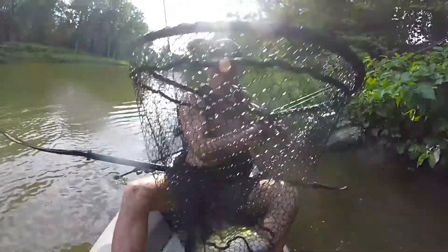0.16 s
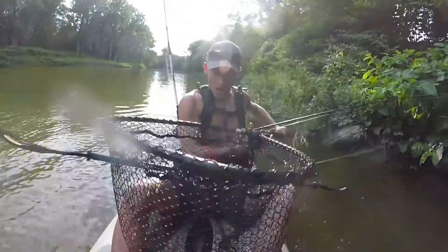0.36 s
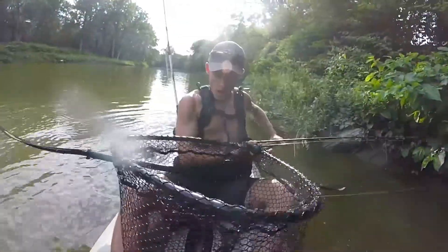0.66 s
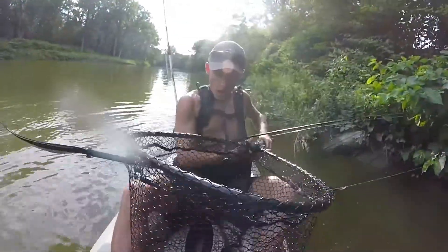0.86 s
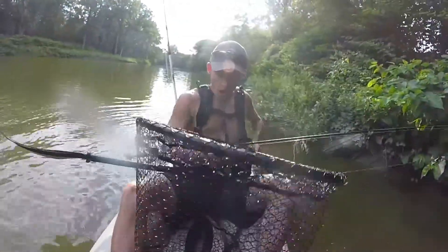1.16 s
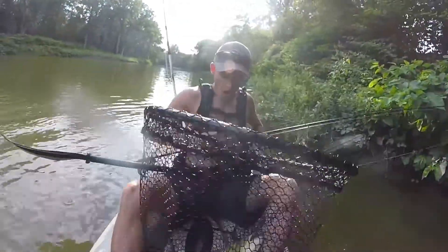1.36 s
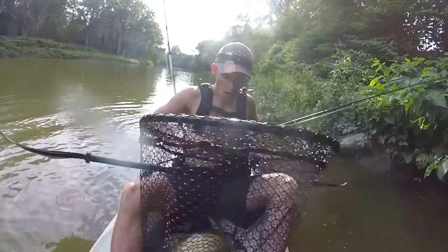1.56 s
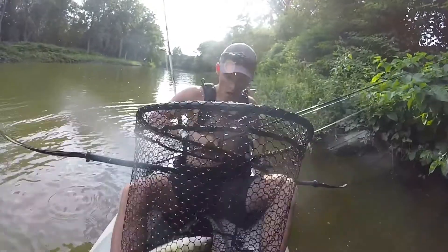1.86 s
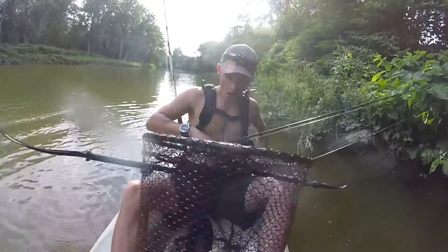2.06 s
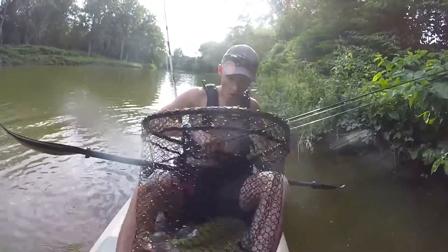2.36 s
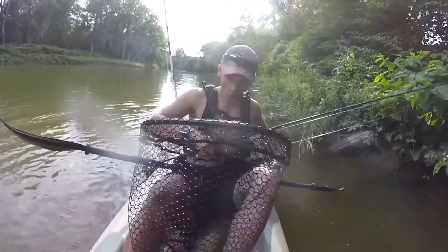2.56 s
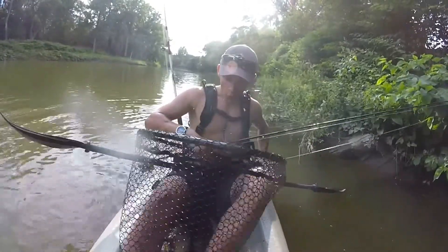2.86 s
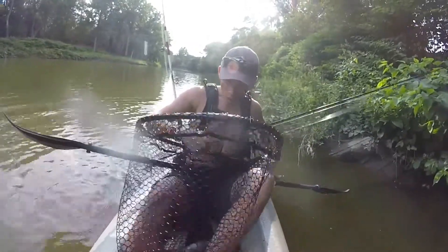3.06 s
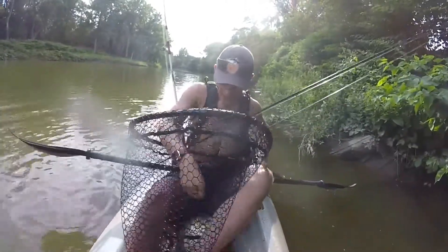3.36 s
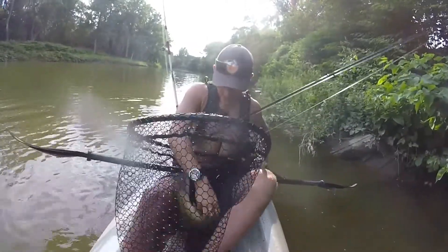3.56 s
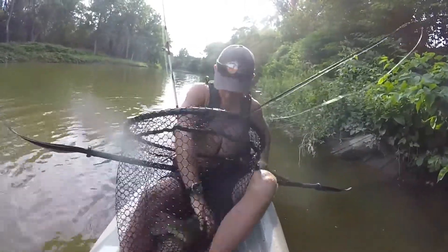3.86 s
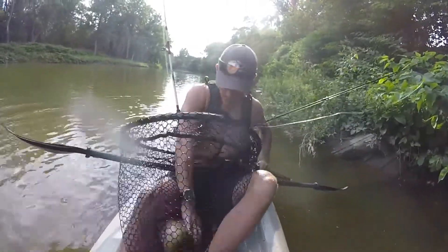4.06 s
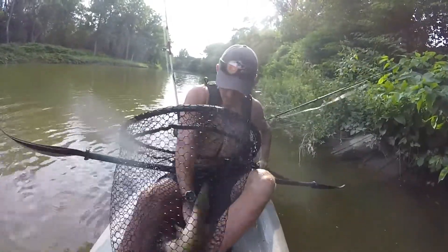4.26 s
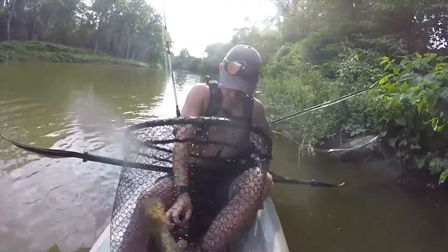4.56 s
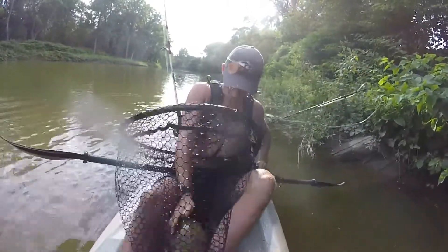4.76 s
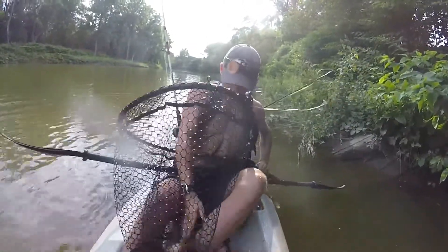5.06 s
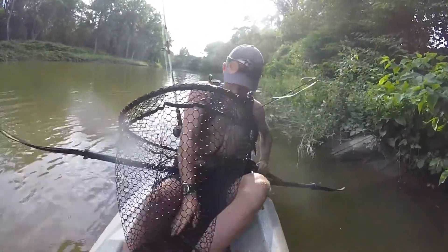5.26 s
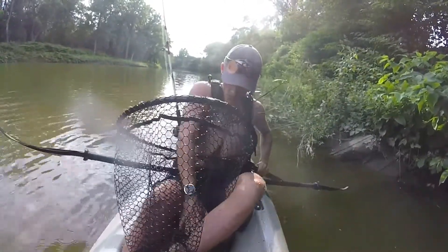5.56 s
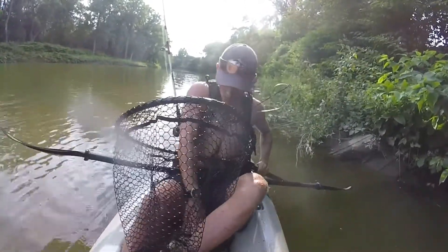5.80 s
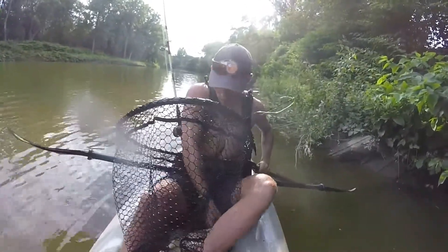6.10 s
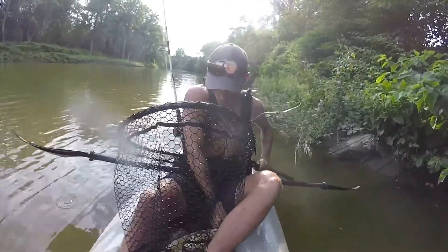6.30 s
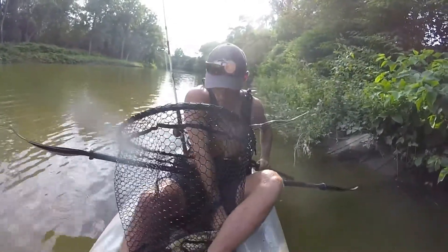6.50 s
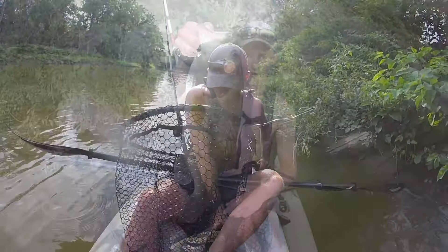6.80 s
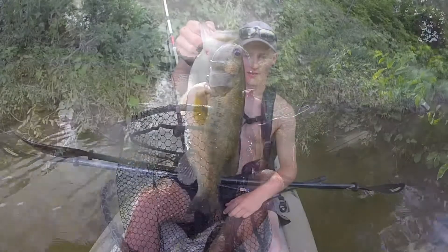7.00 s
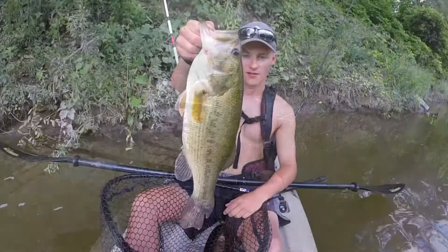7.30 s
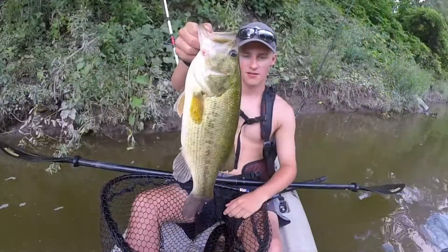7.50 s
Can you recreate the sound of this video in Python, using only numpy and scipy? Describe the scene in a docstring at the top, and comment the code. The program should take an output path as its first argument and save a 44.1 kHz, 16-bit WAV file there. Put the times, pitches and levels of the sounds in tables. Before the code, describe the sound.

A heavy fish flaps in a wet net on a hollow plastic kayak, booming, knocking and rattling, then settles into faint water wash.

```python
"""Fish in a net on a hollow hull

A fish flaps in a wet landing net on the floor of a plastic kayak; the microphone is fixed to the hull.
Blows and ticks are short rough forces on damped modes: the hull booms and knocks, mount and hoop tick.
Random contacts on the same modes make the body rumble, scrape and rustle; drops hiss as shaped noise.
A squeak and a hum are harmonic tones. Filtered noise is the still lake, coloured by housing resonances.
"""
import sys
import numpy as np
from scipy import signal
from scipy.fft import rfft, irfft
from scipy.io import wavfile
from scipy.ndimage import uniform_filter1d

SR = 44100
rng = np.random.default_rng(int(sys.argv[2]) if len(sys.argv) > 2 else 0)


def to_wav(s):
    """Save 16-bit WAV."""
    ch = np.atleast_2d(s).T  # columns
    pcm = np.round(np.clip(ch, -1, 1) * 32767)  # PCM
    wavfile.write(sys.argv[1], SR, pcm.astype(np.int16))


N = 336924
T = np.arange(N) / SR  # t/s of every sample

# All levels are relative: between modes of one body, or between events of one layer.
# blows on the hull [t/s, knock level/dB, boom level/dB, slap level over knock/dB,
# favoured boom f/Hz, contact decay time/ms]
BLOWS = [(0.026, -8.5, 0, -13.5, 160, 9.2), (0.047, -12, -7.5, -32, 165, 7.1),
         (0.149, -23, -42, -13, 70.0, 11), (0.25, -26.5, -34, -8, 67.3, 7.2), (0.318, -42, -24, 8, 105, 12),
         (0.383, -25.5, -7.5, -12, 112, 17), (0.502, -32, -43, -0.5, 135, 17),
         (0.549, -14, -7, -16, 150, 5.9), (0.712, -14, -37, -29, 88, 4.4), (1.042, -24, -16, -6.5, 127, 13),
         (1.272, -16, -6, -19, 109, 2.7), (1.34, -13.5, -41, -22.5, 85, 18),
         (1.455, -23, -3.5, -29, 94.2, 9.8), (1.545, -17.5, -27, -3, 118, 12),
         (1.577, -9, -10, -14.5, 86.1, 5), (1.608, -21.5, -1.5, 0.5, 85.5, 13),
         (1.955, -8, 5, -12.5, 99, 1.5), (2.124, -15.5, -12, -9, 96.9, 13), (2.182, -29, 3, -15, 149, 17),
         (2.213, -17, -12, -7, 139, 8.9), (2.429, -30.5, -59, -9.5, 96, 4),
         (2.532, -4.5, -10, -14.5, 169, 6), (2.583, -15.5, -21, -11, 88.7, 17),
         (2.611, -27, -32, -3, 91.5, 7.3), (2.882, -29, -10.5, -2.5, 83, 14),
         (2.933, -12, -36, -17, 170, 1.8), (3.091, -33.5, -21, -7.5, 80.7, 6.4),
         (3.34, -17, -27, -17, 113, 3.9), (3.384, -22.5, 0, -1, 164, 9.6),
         (3.395, -12, -2.5, -18.5, 91.5, 6), (3.431, -19, -8, -20, 93.5, 6.8),
         (3.582, -30.5, -38, -11.5, 99.6, 9.2), (3.718, -5.5, -15, -6.5, 105, 2.2),
         (3.755, -23.5, -35, -12, 162, 6.2), (4.018, -26, -10.5, -8.5, 82.5, 35),
         (4.085, -19.5, -4, -17, 79, 16), (4.12, -25, -11, -37, 76, 7.3), (4.338, -25, -28, 2, 93.5, 5.3),
         (4.442, -21.5, -24, -27, 70, 8.3), (4.611, -17, -4.5, -8, 73, 3.7),
         (4.744, -24, -35.5, -14, 109, 18), (4.758, -3.5, -1.5, -30.5, 104, 6.5),
         (4.789, -21.5, -27, -32, 104, 7), (4.93, -9, 1.5, -13.5, 80.7, 6.4),
         (4.959, -14.5, 1, -36, 73, 7.2), (5.136, -32, -19, 12, 70.0, 17),
         (5.168, -20.5, -21, 6, 56.5, 8.1), (5.195, -27, -5, -11, 67.3, 11),
         (5.256, -22.5, 3.5, -5, 67.3, 5), (5.358, -16, -31, -18.5, 113, 1.8),
         (5.471, -35, -21, -5.5, 56.5, 15), (5.709, -31, -59.5, -12.5, 107, 18),
         (7.106, -32, -48.5, -15.5, 94, 6.3), (7.269, -46, -42.5, -5, 129, 5.4),
         (7.373, -47, -59.5, 0, 72.7, 9.3), (7.529, -54, -30, -6, 76, 9)]
# flat blows that dent the floor once [t/s, level/dB]
THUMPS = [(1.272, -1.5), (2.936, 3), (5.36, -1.5)]
# ticks of hoop and mount [t/s, level/dB, treble level/dB, contact decay time/ms]
TICKS = [(0.032, -16.5, 7.5, 2.4), (0.1192, -38, -17, 3.5), (0.3097, -31, 1, 11), (0.453, -40.5, 17.5, 3.5),
         (0.506, -33, -14, 8.4), (0.5469, -15, -4, 2.6), (0.7123, -30.5, -11, 4.8), (1.046, -22.5, -21, 16),
         (1.272, -28.5, -13, 4.5), (1.3069, -23.5, 8.5, 1.2), (1.4835, -24, 8.5, 2.2),
         (1.545, -11, -27, 2.6), (1.5917, -18, 10, 2.3), (1.6096, -9, -5.5, 4.2), (1.633, -22, -12, 6.9),
         (1.668, -12, 1, 1.5), (1.8564, -29, 1.5, 2.6), (1.9554, -14.5, -3, 2), (2.0109, -23.5, 9.5, 2),
         (2.157, -21.5, 11.5, 1.7), (2.189, -28, 1, 5.4), (2.22, -21.5, 7.5, 4.4), (2.2837, -25.5, 10, 2.4),
         (2.537, -11, -6, 2.2), (2.544, -27, 4, 2), (2.6182, -25, 5, 1.9), (2.6303, -26.5, 4.5, 2.5),
         (2.8825, -26.5, 8.5, 2), (2.938, -17, 1.5, 1.7), (2.9442, -18, -6, 3.3), (3.055, -37, 7, 2.3),
         (3.0729, -28.5, 2, 1.9), (3.121, -38, 12.5, 3.1), (3.135, -43, 14.5, 3), (3.3408, -32.5, -9, 2.5),
         (3.4, -21, 0, 7.3), (3.6169, -29, 7.5, 1.1), (3.698, -36, -27, 3.3), (3.7192, -7.5, -8.5, 4.2),
         (3.739, -32, 3, 2.1), (3.7584, -26.5, -7, 1.1), (3.8347, -32, 2.5, 2), (4.021, -33, -6, 4.2),
         (4.046, -26.5, 4.5, 4.8), (4.0634, -18.5, 1, 1.5), (4.12, -19.5, 0.5, 2.5),
         (4.143, -34.5, 13.5, 3.5), (4.1634, -35.5, 10, 1.9), (4.3387, -9, -22, 4.8), (4.4419, -14, 2, 1.9),
         (4.6482, -29, -1, 6), (4.745, -33, -11, 5), (4.76, -35, -18, 7), (4.788, -21.5, -21, 9.2),
         (4.829, -27, -21, 5), (4.946, -26, -16, 2.8), (4.999, -33, 7.5, 2.2), (5.0235, -26.5, -14, 2.7),
         (5.06, -12.5, -1, 2.4), (5.0762, -26.5, 11, 2.1), (5.1382, -11, -11.5, 7.2), (5.167, -8.5, -31, 5),
         (5.255, -26, -9, 3.4), (5.312, -9.5, 1, 5.7), (5.3384, -9.5, 2, 4.5), (5.425, -38.5, 8.5, 1.9),
         (5.4443, -33.5, 10.5, 3.2), (5.497, -36.5, -12, 3)]
# damped modes [f/Hz, level/dB, t60/s]: whole hull, hull floor, hull shell, dented floor
BOOM_MODES = [(42, -3.5, 0.31), (73, 0, 0.35), (91.3, -1.5, 0.27), (108.5, -0.5, 0.21), (133.6, -3, 0.17),
              (163.8, -1.5, 0.16)]
KNOCK_MODES = [(217.4, 3.5, 0.05), (240, -3.5, 0.027), (265.3, -1, 0.12), (291.4, -3, 0.14),
               (311, 3, 0.059), (403, -3, 0.028)]
SHELL_MODES = [(520, -0.5, 0.041), (635, -2, 0.034), (777, -4, 0.021), (902, -2.5, 0.021),
               (1071, -6, 0.031), (1168, -4, 0.023), (1620, -10, 0.0075)]
DENT_MODES = [(199, 0, 0.029)]
# damped modes [f/Hz, level/dB, t60/s]: microphone mount, net hoop, small metal part
MOUNT_MODES = [(1110, 3, .009), (1400, -4.5, 0.0027), (1695, 2, 0.023), (1895, -2, 0.018),
               (2380, 3.5, 0.013), (2508, 6.5, 0.021), (2637, -7, 0.052)]
HOOP_MODES = [(3430, -5, 0.018), (4136, -4, 0.0093), (4400, -9.5, 0.005), (4680, 0, 0.0038),
              (5380, -6.5, 0.0091), (6270, -13, 0.0079), (7540, -8, 0.0025), (9600, -32, 0.0018),
              (12700, -18.5, 0.0028), (14000, -28, .01)]
METAL_MODES = [(2700, -5, 0.13), (3480, -2, .13), (5450, 1, 0.074)]
# heaves of the body that rub net and floor
# [peak t/s, rise time/s, rumble level/dB, scrape level/dB, rustle level/dB]
HEAVES = [(.05, 0.026, -14.5, -17.5, -45), (.16, 0.11, -42, -32.5, -49), (0.279, 0.11, -21, -38.5, -43),
          (.4, 0.064, -22.5, -32, -43), (0.519, 0.039, -25.5, -25, -37), (0.598, 0.082, -30, -34, -46),
          (.72, 0.045, -28.5, -42, -62), (1.053, 0.024, -29, -18, -37.5), (1.277, 0.018, -11.5, -28, -39.5),
          (1.42, 0.14, -17, -42, -63), (1.56, 0.017, -5.5, -21.5, -30.5), (1.636, 0.13, -21, -21, -38),
          (1.966, 0.019, -12, -13, -32), (2.198, 0.19, -14.5, -16, -31.5), (2.544, 0.015, -28, -22, -33),
          (2.627, 0.075, -21.5, -23.5, -42), (2.895, 0.014, -20, -30, -38.5),
          (2.952, 0.028, -23, -25, -46.5), (3.119, 0.15, -28, -30, -48.5), (3.35, 0.016, -22.5, -28, -41.5),
          (3.406, 0.052, -13, -17.5, -34), (3.617, 0.095, -21.5, -32, -49),
          (3.741, 0.05, -21, -28.5, -40.5), (3.852, 0.17, -24, -30, -50), (4.029, .03, -21, -25, -41),
          (4.126, 0.17, -26, -32.5, -39), (4.35, 0.16, -32, -31, -48.5), (4.47, 0.16, -27, -27, -41),
          (4.626, 0.0089, -19.5, -21.5, -45), (4.769, 0.057, -17, -14, -31), (4.85, 0.095, -28, -40, -43.5),
          (4.939, 0.019, -17, -23.5, -44), (5.06, 0.11, -37, -22.5, -34.5), (5.171, 0.028, -10.5, -18, -32),
          (5.282, 0.25, -16.5, -21.5, -41), (5.379, 0.42, -18.5, -29.5, -49), (5.45, 0.045, -39, -53, -40),
          (5.6, 0.41, -39, -36, -62), (5.8, 0.12, -42, -60, -74), (7.118, 0.073, -37.5, -39.5, -55),
          (7.31, 0.085, -45.5, -38.5, -53), (7.56, 0.093, -46.5, -54, -60)]
# faint stirring between the heaves [t/s, rumble level/dB, scrape level/dB, rustle level/dB]
STIRRING = [(0, -25, -44, -53), (.6, -33.5, -39.5, -52), (1.1, -51, -58, -58.5), (2.0, -34, -55, -54),
            (2.6, -37.5, -47, -59), (4.0, -49.5, -55.5, -79.5), (5.3, -37, -44.5, -66.5),
            (6.3, -53, -59.5, -60), (7.64, -56.5, -58.5, -73)]
# drops flung off the net [start t/s, level/dB, time to the peak/ms]
SPRAY = [(.16, -63.5, 22), (1.62, -61, 19), (3.36, -60.5, 30), (4.711, -56, 11), (5.145, -59.5, 30),
         (5.342, -52, 7.2), (6.325, -60.5, 9.5)]
# a wet finger slips on plastic [t/s, fundamental f/Hz, level/dB]; only high partials sound
SQUEAK = [(3.17, 378, -72), (3.19, 398, -59), (3.21, 420, -54), (3.222, 436, -70)]
# the shell hums as the net slides off [t/s, fundamental f/Hz, level/dB]; partials 2 to 4 sound
HUM = [(5.52, 288, -58), (5.56, 287, -43), (5.68, 284, -43), (5.7, 283, -60)]
# spectrum of the lake wash [f/Hz, level per Hz/dB]
LAKE_SPECTRUM = [(18, -21), (30, 4.5), (165, -12.5), (1240, -21.5), (1650, -18.5), (2040, -29), (2650, -22),
                 (2940, -24), (10300, -39.5), (14500, -46.5), (15700, -89.5)]
# resonances of the microphone housing [f/Hz, width/Hz, boost/dB]
HOUSING = [(555, 48, 7.5), (1660, 80, 7), (1880, 46, 9.5), (2665, 55, 10.5), (4130, 190, 5),
           (5040, 890, 4.5), (7050, 560, 2.5)]
# level of the background [t/s, level/dB]
LAKE_LEVEL = [(0, -49.5), (.85, -54), (1.15, -50.5), (1.9, -53), (2.5, -50.5), (2.7, -65), (3.3, -61.5),
              (4.0, -70), (4.55, -55.5), (5.4, -58), (5.8, -52), (6.5, -51.5), (7.2, -59), (7.64, -58.5)]

BASS_LATE_MS = 2.936  # boom and knock follow the slap
TICK_HZ, TICK_DB_PER_OCTAVE = 2400, 29.5  # duller ticks favour lower modes of the mount
HOOP_DB = -8.5  # hoop against mount
CLINK_S, CLINK_DB = 5.446, -42
RISE_DB = 21.5  # climb of a heave during its rise time
RUMBLE_FALL_DB_S, SCRAPE_FALL_DB_S, RUSTLE_FALL_DB_S = 105.5, 272.5, 232.5
TOP_HZ = 15800


def blows():
    """Modal excitation by impact: each flap slaps the shell, then knocks the floor and booms in the hull."""
    s, knock_db, boom_db, bright_db, boom_hz, ms = np.transpose(BLOWS)
    late = s + BASS_LATE_MS / 1000
    boom_force = strikes(late, boom_db, ms, 1.0, boom_hz)
    knock_force = strikes(late, knock_db, ms, 2.28, edge=0.56, rise=0.2)
    slap_force = strikes(s, knock_db + bright_db, ms, 7.3, scatter_db=1.5)
    boom = ring(BOOM_MODES, boom_force, 410)
    knock = ring(KNOCK_MODES, knock_force, 730)
    slap = ring(SHELL_MODES, slap_force, 2200)
    return boom + knock + slap


def thumps():
    """Impulse response of one damped mode: a single inward push of the floor springs back."""
    s, db = np.transpose(THUMPS)
    push = np.zeros(N)
    push[(s * SR).astype(int)] = -undb(db)  # inward
    return ring(DENT_MODES, lambda hz: push, 700)


def ticks():
    """Modal excitation by hard contact: short forces ring the mount and the hoop."""
    s, db, treble_db, ms = np.transpose(TICKS)
    octaves_down = np.minimum(treble_db, 0) / TICK_DB_PER_OCTAVE
    favour_hz = TICK_HZ * 2 ** octaves_down
    mount_force = strikes(s, db, ms, 3.1, favour_hz, octaves=0.74, scatter_db=2.5)
    hoop_force = strikes(s, db + treble_db + HOOP_DB, ms, 2.51, rise=0.2, edge=0.91)
    return ring(MOUNT_MODES, mount_force, 2040) + ring(HOOP_MODES, hoop_force, 12000)


def clink():
    """Impulse response of a small metal part: one tap rings its modes."""
    tap = undb(CLINK_DB) * (np.arange(N) == int(CLINK_S * SR))
    return ring(METAL_MODES, lambda hz: tap, 9000)


def drag():
    """Friction as random micro-impacts: uneven rubbing excites modes of hull, mount and hoop."""
    rumble_db, scrape_db, rustle_db = np.transpose(HEAVES)[2:]
    rumble_rest, scrape_rest, rustle_rest = curves(STIRRING)
    rumble_gain = heave(rumble_db, rumble_rest, RUMBLE_FALL_DB_S)
    scrape_gain = heave(scrape_db, scrape_rest, SCRAPE_FALL_DB_S)
    rustle_gain = heave(rustle_db, rustle_rest, RUSTLE_FALL_DB_S)

    rumble = unit(ring(BOOM_MODES, grit(200, 1.4), 300))
    rub = grit(450, 3.28)
    floor = unit(ring(KNOCK_MODES, rub, 860))
    shell = unit(ring(SHELL_MODES, rub, 1300))
    scrape = unit(floor + undb(-8.5) * shell)
    mesh = grit(900, 2.9)
    mount = unit(ring(MOUNT_MODES, mesh, 4000))
    hoop = unit(ring(HOOP_MODES, mesh, 15000))
    rustle = undb(-4) * mount + undb(-20) * hoop
    snag = undb(2.2 * walk(35))  # the wet mesh catches and lets go
    return rumble_gain * rumble + snag * (scrape_gain * scrape + rustle_gain * rustle)


def heave(peak_db, rest_db, fall_db_s):
    """Addition of powers: heaves rise and fall at steady dB rates over the resting level."""
    s, rise = np.transpose(HEAVES)[:2, :, None]
    t = T[::32]  # a coarse grid is enough for a level
    climb_db = RISE_DB * (t - s) / np.maximum(rise, .005)
    fall_db = -fall_db_s * (t - s)
    shape_db = np.where(t < s, climb_db, fall_db)
    power = undb(2 * (peak_db[:, None] + shape_db)).sum(axis=0)
    return np.sqrt(np.interp(T, t, power) + undb(2 * rest_db))


def spray():
    """Band-limited granular noise: fine drops swell into a bright hiss and thin out."""
    swell = 0
    for s, db, ms in SPRAY:
        age = np.maximum(T - s, 0) * 1000 / ms
        swell = swell + undb(db) * np.e * age * np.exp(-age)  # peaks at age 1
    bright = signal.butter(2, [3800, 10500], "band", fs=SR, output="sos")
    drops = grit(4000, 2.5)(0)
    return swell * unit(signal.sosfilt(bright, drops))


def squeak():
    """Harmonic synthesis without a fundamental: a wet finger slips on plastic."""
    return tone(SQUEAK, [(4, 0), (9, -8), (11, -18), (12, -12), (13, -18)], .007)


def hum():
    """Harmonic synthesis of low partials: the shell hums as the net slides off."""
    return tone(HUM, [(2, 0), (3, -12), (4, -14)], .02)


def lake():
    """Spectral shaping of noise: a soft wash of water, leaves and hiss through the housing resonances."""
    hz = np.fft.rfftfreq(N, 1 / SR) + 1  # keeps the logarithm finite
    table_hz, table_db = np.transpose(LAKE_SPECTRUM)
    db = np.interp(np.log(hz), np.log(table_hz), table_db)
    for f, width, boost_db in HOUSING:
        db = db + boost_db / (1 + (2 * (hz - f) / width) ** 2)
    wash = unit(irfft(rfft(rng.standard_normal(N)) * undb(db), N))
    level_db, = curves(LAKE_LEVEL)
    return wash * undb(level_db + walk(30))


def ring(modes, push, soft_hz):
    """Modal superposition: push(hz) forces each damped mode; a low-pass models the soft contact."""
    out = 0
    for hz, db, t60 in modes:
        pole = np.exp((2j * np.pi * hz - np.log(1000) / t60) / SR)
        out = out + undb(db) * signal.lfilter([1], [1, -pole], push(hz)).imag
    soft = signal.butter(2, min(soft_hz, .45 * SR), fs=SR, output="sos")
    mode_power = np.sum(undb([2 * m[1] for m in modes]))
    return signal.sosfilt(soft, out) / np.sqrt(mode_power)


def strikes(s, db, ms, rough, favour_hz=None, octaves=0.14, rise=0.14, edge=1., scatter_db=1.0):
    """Impact force: a sharp edge, then rough contact dying exponentially, drawn anew for every mode."""
    k = np.arange(3072)  # samples of one contact

    def push(hz):
        out = np.zeros(N + len(k))
        chance = rng.standard_normal((len(s), len(k) + 1))
        size = undb(db + scatter_db * chance[:, 0])
        if favour_hz is not None:  # the place of the blow favours some modes
            size = size / (1 + (np.log2(hz / favour_hz) / octaves) ** 2)
        span = np.clip(ms, .3, 40)[:, None] * SR / 1000  # decay time in samples
        grip = 1 - np.exp(-k / (rise * span))  # the contact spreads before it dies away
        force = rough * chance[:, 1:] * grip * np.exp(-k / span) / np.sqrt(span)
        force[:, 0] = edge
        for at, f in zip((s * SR).astype(int), size[:, None] * force):
            out[at:at + len(k)] += f
        return out[:N]
    return push


def grit(rate, spread_db):
    """Poisson-like contacts: rate per second on average, with random sign and force for each mode."""
    hit = rng.random(N) < rate / SR
    size = hit * undb(spread_db * np.minimum(rng.exponential(size=N), 3))
    return lambda hz: size * rng.standard_normal(N)


def tone(table, partials, waver):
    """Harmonic series with random frequency modulation; partials are (multiple, level/dB)."""
    hz, db = curves(table)
    phase = 2 * np.pi * np.cumsum(hz * (1 + waver * walk(80))) / SR
    on = (T > table[0][0]) & (T < table[-1][0])
    wave = 0
    for multiple, partial_db in partials:
        wave = wave + undb(partial_db + 2 * walk(42)) * np.sin(multiple * phase)
    return on * undb(db) * wave


def walk(rate):
    """Smoothed random steps: values held 1 / rate s, averaged twice and scaled to rms 1."""
    k = int(SR / rate)
    steps = np.repeat(rng.standard_normal(N // k + 1), k)
    return unit(uniform_filter1d(uniform_filter1d(steps, k), k)[:N])


def curves(table):
    """Linear interpolation: the columns of a table at every sample."""
    s, *columns = np.transpose(table)
    return [np.interp(T, s, c) for c in columns]


def undb(db):
    """Decibel law: the amplitude gain of a level."""
    return 10 ** (np.asarray(db) / 20)


def unit(x):
    """Normalisation by effective value: scaled to rms 1."""
    return x / np.sqrt(np.mean(x ** 2))


def scene():
    """Linear superposition: all sources reach one microphone."""
    impacts = blows() + thumps() + ticks() + clink()
    return (impacts + drag() + spray() + squeak() + hum() + lake())[None]


def record(dry):
    """Band limitation and saturation: drops the deepest bass, rounds loud peaks and cuts the top."""
    high_pass = signal.butter(3, 37, "high", fs=SR, output="sos")
    low_pass = signal.ellip(8, .2, 70, TOP_HZ, fs=SR, output="sos")
    rounded = 1.3 * np.tanh(signal.sosfilt(high_pass, dry) / 1.3)
    return signal.sosfilt(low_pass, rounded)


dry = scene()
out = record(dry)
to_wav(out)
```